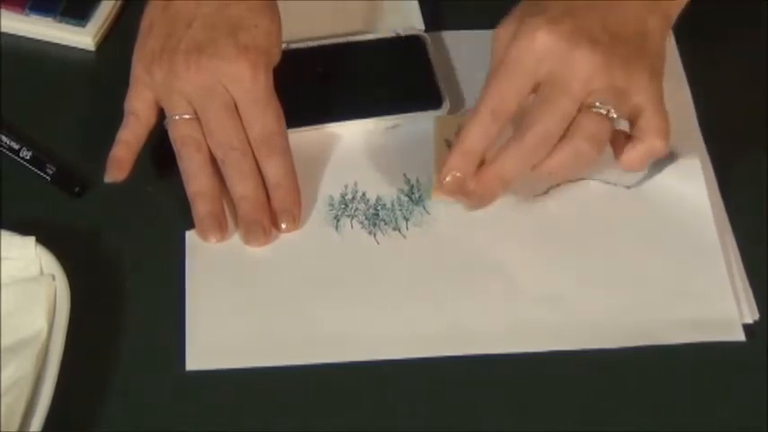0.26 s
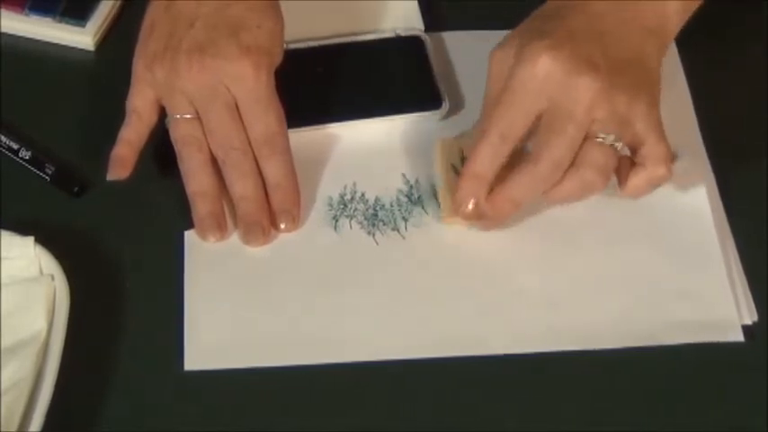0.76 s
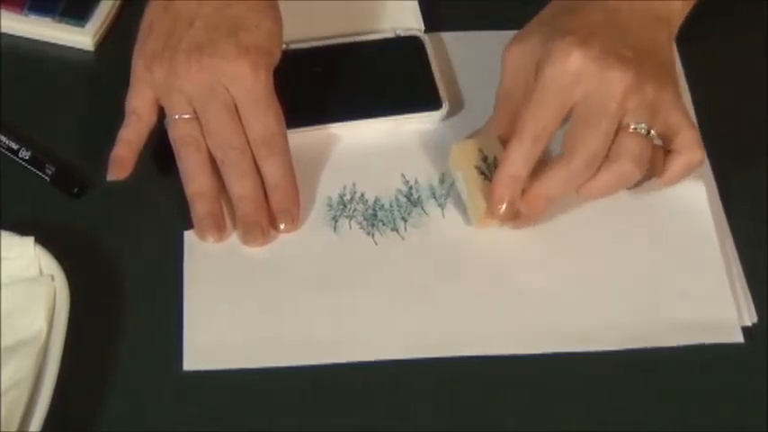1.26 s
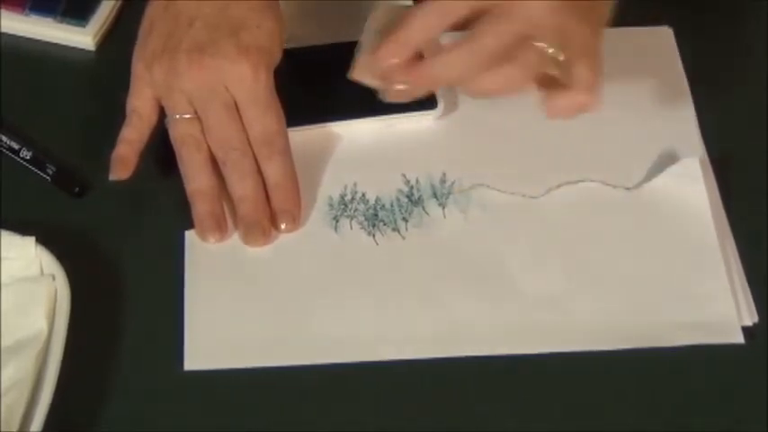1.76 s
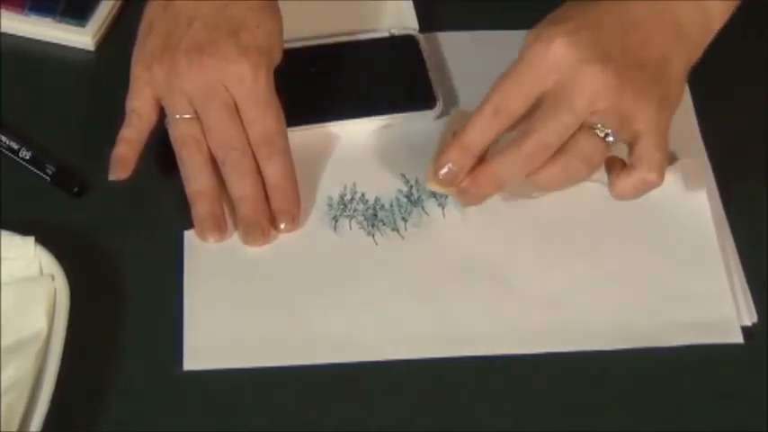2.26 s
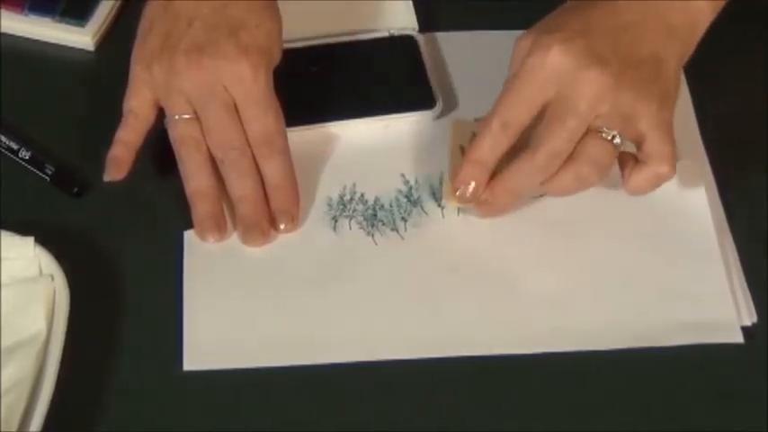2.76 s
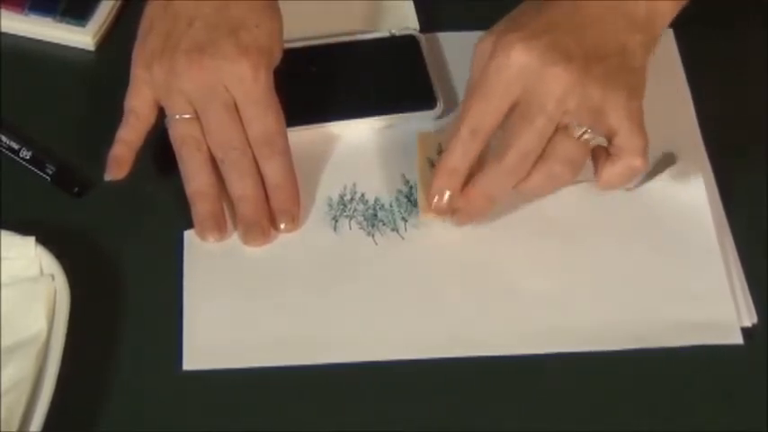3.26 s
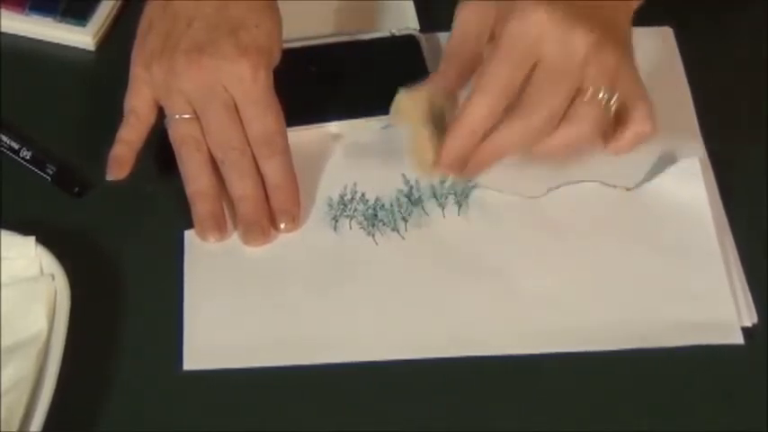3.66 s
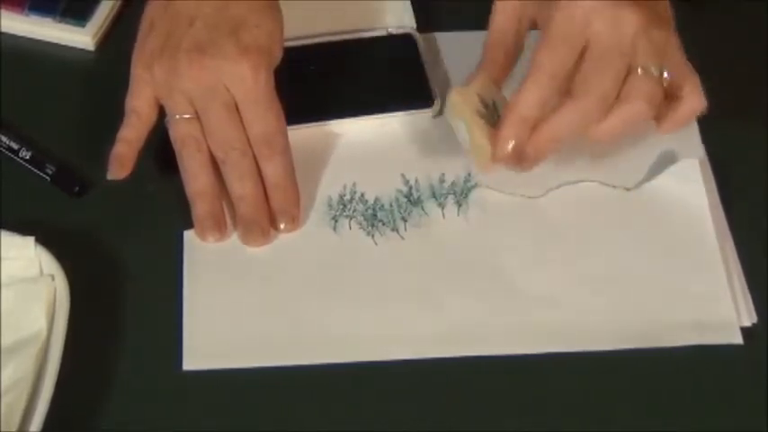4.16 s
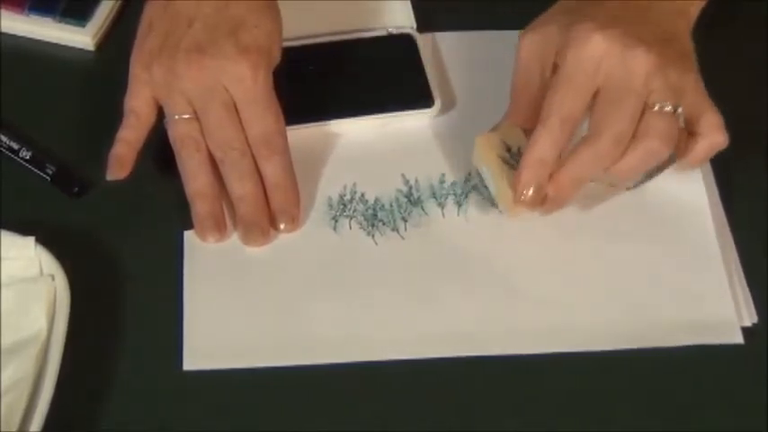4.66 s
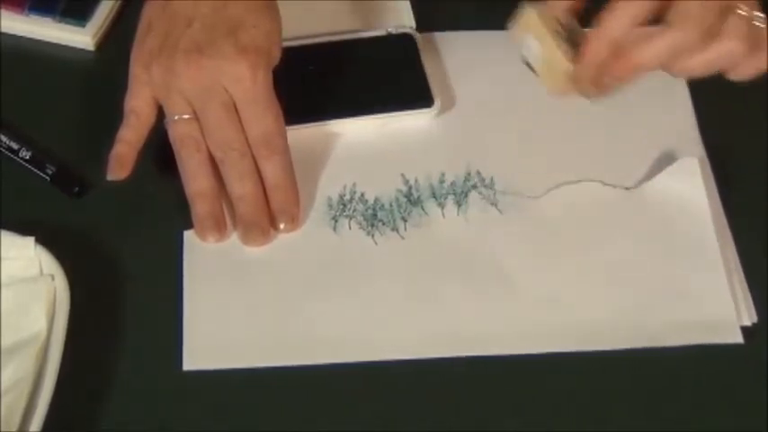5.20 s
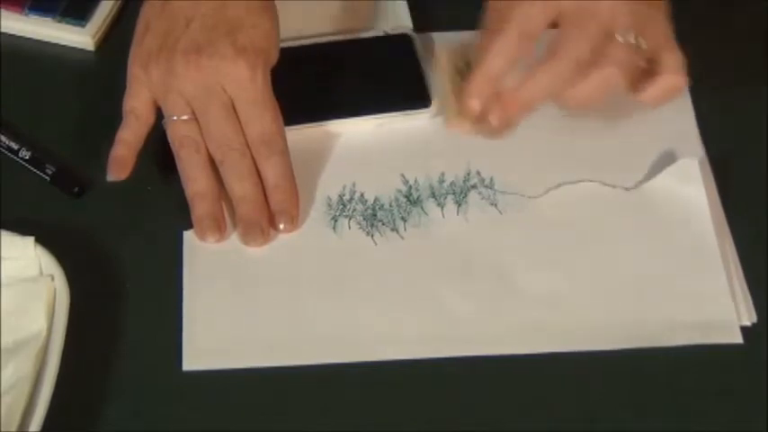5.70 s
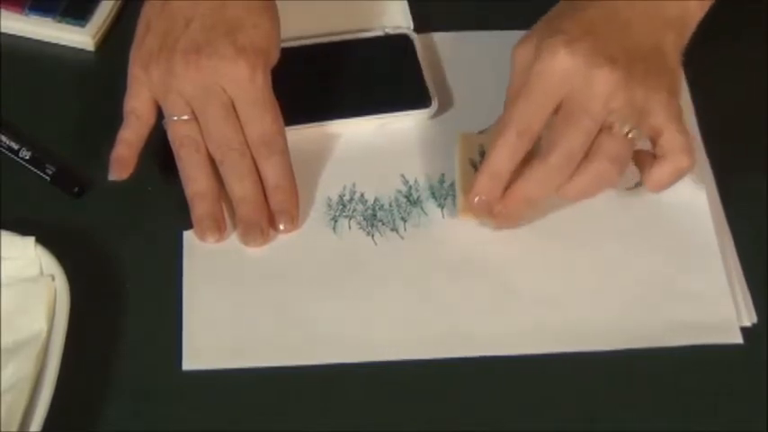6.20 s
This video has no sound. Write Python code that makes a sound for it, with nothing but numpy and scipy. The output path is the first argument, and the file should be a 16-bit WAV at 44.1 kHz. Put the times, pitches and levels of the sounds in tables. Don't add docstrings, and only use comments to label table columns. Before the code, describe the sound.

Hollow woody knocks of a hand stamp on a papered table, some loud, some soft, broken by padded thuds in a small quiet room.

```python
import sys
import numpy as np
from scipy import signal
from scipy.fft import rfft, irfft
from scipy.io import wavfile
from scipy.ndimage import uniform_filter1d

SR = 44100
rng = np.random.default_rng(int(sys.argv[2]) if len(sys.argv) > 2 else 0)


def materialize(psi):
    bounded = np.clip(np.atleast_2d(psi).T, -1, 1)
    quanta = np.round(bounded * 32767).astype(np.int16)
    wavfile.write(sys.argv[1], SR, quanta)


def field_ratio(decibels):
    return 10 ** (np.asarray(decibels, dtype=float) / 20)


N = 284004
LEAD = SR // 10

# start_s, slap_peak_db, boom_db, slap_tilt_db_per_octave, block_ring_hz
PAPER_BLOWS = [(0.5062, -25.5, -24, -2, 1210), (0.825, -24, -18.5, -0.3, 810),
               (1.054, -9.5, -13, -1.2, 1290), (1.2631, -6.5, -12, -2, 1290),
               (2.4403, -31.5, -31.5, -2, 1330), (2.7936, -16.5, -14.5, -4, 1330),
               (3.1028, -9, -15, -2.5, 650), (3.353, -25, -15.5, -0.5, 640), (3.5874, -20, -17, -1.5, 1230),
               (4.391, -16, -16.5, -4.5, 1490), (4.6352, -15.5, -20, -5, 770),
               (4.7935, -18.5, -18, -1.7, 845), (4.9413, -14, -15.5, 2, 870),
               (6.075, -11.5, -13.5, -1.5, 830), (6.2824, -29, -17, 2, 1520)]
# start_s, boom_db, slap_under_boom_db
PAD_BLOWS = [
    (1.6523, -14, 13),
    (3.9561, -14, 17),
    (5.535, -14.5, 14.5),
]
# before_start_s, boom_db, slap_under_boom_db
EARLIER_PAD_BLOW = (0.043, -12.5, 9.2)
# start_s, peak_db
PEEL_TICKS = [
    (1.4886, -58),
    (4.9008, -53),
]
# start_s, length_s, level_db
PAPER_RUSTLES = [
    (0.937, 0.0093, -51),
    (4.688, 0.0086, -47),
    (4.838, 0.017, -49.5),
    (6.305, 0.031, -56),
    (6.385, 0.016, -56),
]

# mode_hz, level_db, t60_s
MODES_AT_PAPER = [(88, -25, 0.25), (141.2, -7.5, 0.11), (168, -10.5, 0.12), (242, -13, 0.14),
                  (269, -7.5, 0.067), (296, 3.1, 0.041), (340.5, -2, 0.054), (371.5, -18, 0.085),
                  (390.1, -1, 0.039), (467, -7.5, 0.052), (521, -9, 0.078), (623, -15, 0.12),
                  (689, -25.5, 0.12), (756, -10.5, 0.052), (836, -12.5, 0.056), (950, -16, 0.1),
                  (986, -18.5, 0.059), (1057, -10.5, 0.046), (1113, -19.5, 0.095), (1347, -18.5, 0.062),
                  (1416, -16, 0.061), (1517, -17.5, 0.051), (1766, -22, 0.014), (1823, -27, 0.033)]
# mode_hz, level_db, t60_s
MODES_AT_PAD = [(79, -25, 0.43), (137.3, -13, 0.28), (165, -8, 0.063), (248, -3.5, 0.091),
                (275, -3.5, 0.081), (302.6, 3.5, 0.084), (343, -9.5, 0.17), (370, -14, 0.28),
                (408, -1, 0.093), (443, 1, 0.098), (498.4, -5.5, 0.1), (602, -11, 0.13), (668, -26.5, 0.2),
                (695, -3, 0.043), (771, -15.5, 0.1), (890, -31, 0.046), (960, -13, 0.035),
                (1060, -12.5, 0.061), (1170, -24, 0.073), (1251, -20, 0.13), (1356, -16.5, 0.083),
                (1437, -17.5, 0.052), (2190, -13, 0.064)]
THUD_TO_HZ, UPPER_FROM_HZ, IN_STEP_FROM_HZ, KNOCK_FROM_HZ = 200, 390, 580, 950
SPOT_DB = 1.5
BODY_DB_PER_SLAP_DB, KNOCK_DB_PER_SHARPNESS_DB = 0.47, 0.49
RING_DB, RING_OCTAVES = 6.5, 0.33
PAD_RING_HZ, PAD_TILT_DB = 1330, -6

# freq_hz, level_db_per_hz
SLAP_SPECTRUM = [(400, -8.5), (1100, -1), (1800, -6), (2600, -7), (3700, -3.5), (5000, -7), (6500, -8.5),
                 (9000, -10), (12500, -10), (16500, -31)]
SECOND_EDGE_S, SECOND_EDGE_DB = 0.0008, -7
# delay_s, level_db
NEAR_ECHOES = [(.0022, -18), (.0062, -52)]
FLUTTER_S, FLUTTER_DB, FLUTTER_LOSS_DB, FLUTTER_ROUNDS = 0.0099, -10, 8, 3
# freq_hz, t60_s
ROOM_DECAY = [(100, 0.2), (400, 0.44), (1500, 0.28), (5000, 0.11), (14000, 0.16)]
FELT_S, FELT_UNDER_DB, RUSTLE_HZ = 0.01, 32.5, 10000

# freq_hz, level_db_per_hz
AIR_SPECTRUM = [(15, -52), (25, 18.5), (91, -15), (119, -1), (148, -10.5), (228, -5.5), (472, -10),
                (602, -7.5), (926, -12), (1280, -12), (1430, -13), (1970, -16), (15700, -22.5)]
AIR_DB = -44.5
# freq_hz, side_re_mid_db
AIR_SIDE_SPECTRUM = [(40, -20), (300, -3.5), (2000, -1.5), (15000, -10.5)]
# centre_hz, width_hz, level_db
FAN_RESONANCES = [(123, 14, -58), (908, 34, -56), (1134, 24, -63.5), (3000, 84, -66), (9160, 120, -72)]
WHISTLE_HZ, WHISTLE_DB = 15734, -65
TOP_CUT_HZ = 15760


def at_hz(points, hz):
    p = np.array(points)
    return np.interp(np.log(hz + 1), np.log(p[:, 0]), p[:, 1])


def colour(x, spectrum):
    size = x.shape[-1]
    gain_db = at_hz(spectrum, np.fft.rfftfreq(size, 1 / SR))
    return irfft(rfft(x) * field_ratio(gain_db), size)


def rms_one(x):
    return x / np.sqrt(np.mean(x ** 2) + 1e-20)


def lowpass(x, hz):
    return signal.sosfilt(signal.butter(2, hz, fs=SR, output="sos"), x)


def clicks(times_s, db):
    line = np.full(N + LEAD, 1e-18)
    line[np.round(times_s * SR).astype(int) + LEAD] = field_ratio(db)
    return line


def table_boom(blows, modes, travel_s, soft_hz, boom_db, body_db, knock_db, thud_db, thud_share):
    start_s, slap_db, blow_db, _, ring_hz = np.array(blows).T
    body = BODY_DB_PER_SLAP_DB * slap_db + body_db
    knock = KNOCK_DB_PER_SHARPNESS_DB * (slap_db - blow_db) + knock_db
    spot_db = rng.normal(0, SPOT_DB, (len(blows), len(modes)))
    out = 0
    for k, (hz, db, t60_s) in enumerate(modes):
        level_db = db + blow_db + boom_db
        if hz < THUD_TO_HZ:
            level_db = db + thud_share * blow_db + thud_db + spot_db[:, k]
        if hz > UPPER_FROM_HZ:
            ring_db = RING_DB * np.exp(-(np.log2(hz / ring_hz) / RING_OCTAVES) ** 2)
            level_db = level_db + ring_db + spot_db[:, k] + (body if hz < KNOCK_FROM_HZ else knock)
        r, w = field_ratio(-60 / (t60_s * SR)), 2 * np.pi * hz / SR
        late_s = travel_s * (np.sqrt(1000 / hz) - .5)
        sense = -1 if hz > IN_STEP_FROM_HZ else (-1) ** (k + 1)
        push = clicks(start_s + late_s, level_db)
        out = out + sense * signal.lfilter([0, np.sin(w)], [1, -2 * r * np.cos(w), r * r], push)
    return lowpass(out, soft_hz)


def across(x, lag_s, side_db):
    thin = signal.butter(1, 350, "high", fs=SR, output="sos")
    side = field_ratio(side_db) * signal.sosfilt(thin, np.roll(x, round(lag_s * SR)))
    return np.array([x + side, x - side])


def slaps(events, length_s, smooth, gain_db):
    out, t = np.zeros(N + LEAD), np.arange(-100, 412) / SR
    swell = (t > 0) * t / length_s * np.exp(-np.abs(t) / length_s)
    tones = rfft(rng.standard_normal((len(events), 512)) * swell)
    usual = uniform_filter1d(np.abs(tones), size=9, axis=1)
    tones = tones / usual ** np.clip(smooth, 0, 1)
    puffs = colour(irfft(tones) * (t > 0), SLAP_SPECTRUM)
    rocking = SECOND_EDGE_S * SR * (.5 + rng.random(len(events)))
    for (start_s, db, tilt_db), puff, lag in zip(events, puffs, rocking):
        puff = colour(puff, [(500, -3 * tilt_db), (16000, 2 * tilt_db)])
        puff = puff + field_ratio(SECOND_EDGE_DB) * np.roll(puff, int(lag))
        puff = puff * (t > -5 / SR)
        i = round(start_s * SR) - 80 + LEAD
        out[i:i + 512] += field_ratio(db + gain_db) * rms_one(puff)
    return out


def echoes(x, dull_hz):
    out, dull = np.array([x, x]), lowpass(x, dull_hz)
    flutter = [((k + 1) * FLUTTER_S, FLUTTER_DB - k * FLUTTER_LOSS_DB) for k in range(FLUTTER_ROUNDS)]
    for k, (delay_s, db) in enumerate(list(NEAR_ECHOES) + flutter):
        for ch in (0, 1):
            lag = round(delay_s * SR) + (k + ch) % 2
            out[ch, lag:] += field_ratio(db) * dull[:-lag]
    return out


def rustles(events, grains_per_s, grain_db):
    out, t = np.zeros(N + LEAD + 4096), np.arange(4096) / SR
    draws = rng.random((len(events), 2, 4096))
    band = signal.butter(1, [RUSTLE_HZ / 1.7, min(RUSTLE_HZ * 3.1, 16000)], "band", fs=SR, output="sos")
    for (start_s, length_s, db), (born, size) in zip(events, draws):
        sign = np.sign(born * 1e6 % 1 - .5)
        grains = (born < grains_per_s / SR) * field_ratio(-grain_db * np.log(size + 1e-3)) * sign
        swell = np.e * t / length_s * np.exp(-t / length_s)
        i = round(start_s * SR) + LEAD
        out[i:i + 4096] += field_ratio(db) * rms_one(signal.sosfilt(band, grains)) * swell
    return out[:N + LEAD]


def room(x, onset_s, side_db):
    t, tail = np.arange(SR // 2) / SR, 0
    edges_hz = 70 * 2 ** np.arange(0, 8.1, .5)
    for low, high in zip(edges_hz, edges_hz[1:]):
        half_octave = signal.butter(2, [low, high], "band", fs=SR, output="sos")
        band = signal.sosfilt(half_octave, rng.standard_normal((2, len(t))))
        tail = tail + band * field_ratio(-60 * t / at_hz(ROOM_DECAY, np.sqrt(low * high)))
    mid, side = tail * (1 - np.exp(-t / onset_s)) / np.sqrt(SR)
    side = field_ratio(side_db) * side
    return signal.fftconvolve([x, x], [mid + side, mid - side], axes=1)[:, :len(x)]


def fan():
    out = 0
    for hz, width_hz, db in FAN_RESONANCES:
        r = np.exp(-np.pi * width_hz / SR)
        poles = [1, -2 * r * np.cos(2 * np.pi * hz / SR), r * r]
        out = out + field_ratio(db) * rms_one(signal.lfilter([1, 0, -1], poles, rng.standard_normal(N)))
    return out


def whistle():
    return np.sqrt(2) * field_ratio(WHISTLE_DB) * np.sin(2 * np.pi * WHISTLE_HZ * np.arange(N) / SR)


def hiss():
    mid, side = colour(rng.standard_normal((2, N)), AIR_SPECTRUM)
    side = colour(side, AIR_SIDE_SPECTRUM)
    return field_ratio(AIR_DB) / np.std(mid) * np.array([mid + side, mid - side])


def scene():
    before_s, *before_db = EARLIER_PAD_BLOW
    pad = [(s, db - under_db, db, PAD_TILT_DB, PAD_RING_HZ)
           for s, db, under_db in [(-before_s, *before_db), *PAD_BLOWS]]
    boom = table_boom(PAPER_BLOWS, MODES_AT_PAPER, travel_s=0.0017, soft_hz=2100, boom_db=7.0,
                      body_db=3.0, knock_db=-6.5, thud_db=-11.0, thud_share=0.32)
    boom += table_boom(pad, MODES_AT_PAD, travel_s=0.00095, soft_hz=1890, boom_db=2.5,
                       body_db=14.5, knock_db=0.5, thud_db=-12.0, thud_share=0.43)
    paper_slaps = [(s, db, tilt_db) for s, db, _, tilt_db, _ in PAPER_BLOWS]
    pad_slaps = [(s, db, tilt_db) for s, db, _, tilt_db, _ in pad]
    slap = slaps(paper_slaps, length_s=0.00023, smooth=1.0, gain_db=-15.0)
    slap += slaps(pad_slaps, length_s=0.0014, smooth=0.46, gain_db=-0.5)
    peel = slaps([(s, db, 0.3) for s, db in PEEL_TICKS], length_s=0.00022, smooth=0.47, gain_db=6.0)
    felt = [(s, FELT_S, db - FELT_UNDER_DB) for s, _, db, *_ in pad]
    fibres = rustles(list(PAPER_RUSTLES) + felt, grains_per_s=5100, grain_db=0.5)
    near = across(boom, 0.00303, side_db=-18.5) + echoes(slap, dull_hz=12600) + peel + fibres
    wet = field_ratio(3.0) * room(boom, 0.0099, side_db=-14.5) + field_ratio(12.5) * room(slap, 0.0018, side_db=-8.5)
    return (near + wet)[:, LEAD:] + fan() + whistle() + hiss()


def low_pass(x):
    return signal.sosfilt(signal.butter(12, 16660, fs=SR, output="sos"), x)


def record(dry):
    bass = signal.butter(3, 58, "high", fs=SR, output="sos")
    top = signal.ellip(12, .3, 30, TOP_CUT_HZ, fs=SR, output="sos")
    return low_pass(signal.sosfilt(np.vstack([bass, top]), dry))


dry = scene()
out = record(dry)
materialize(out)
```